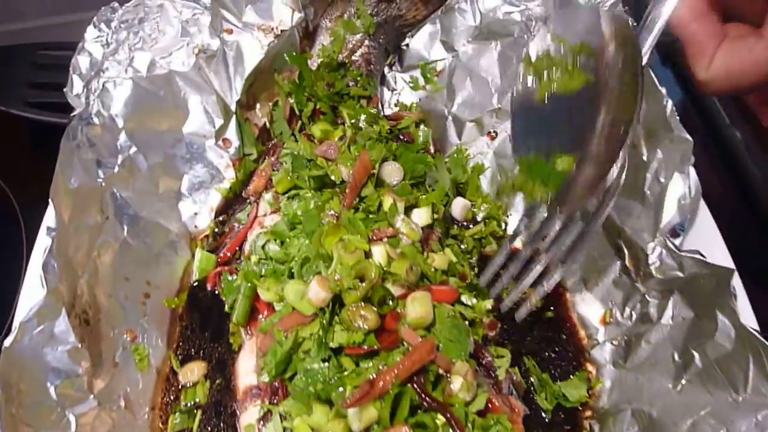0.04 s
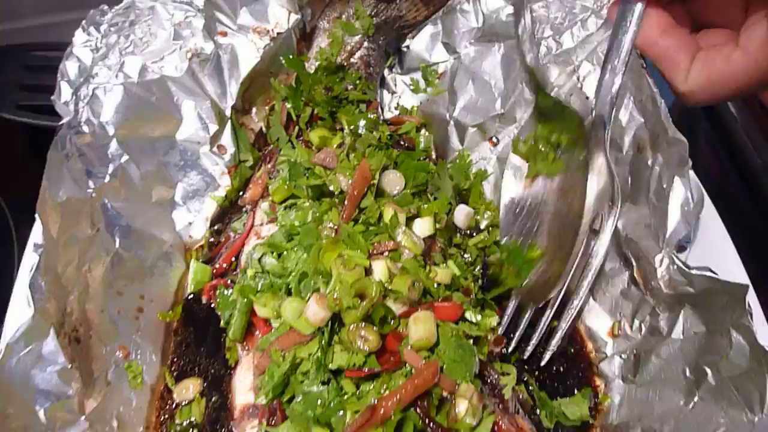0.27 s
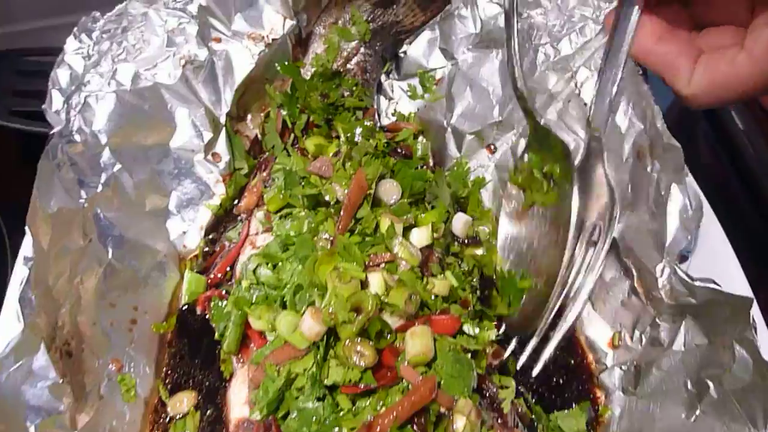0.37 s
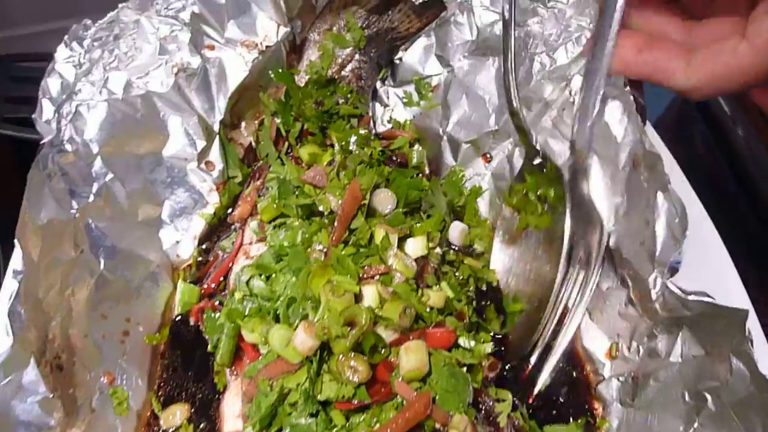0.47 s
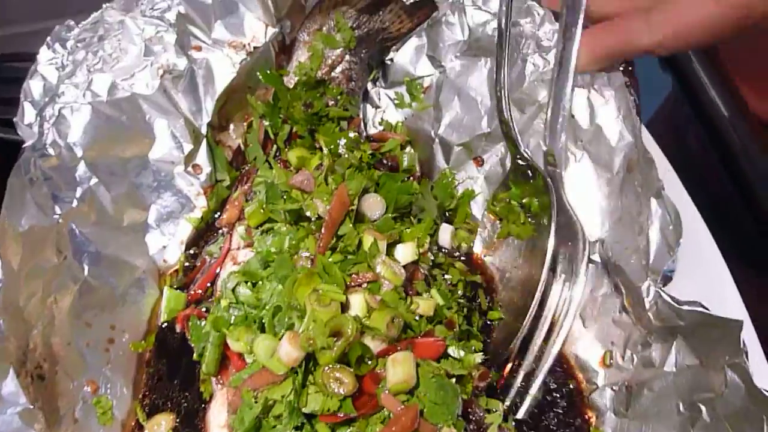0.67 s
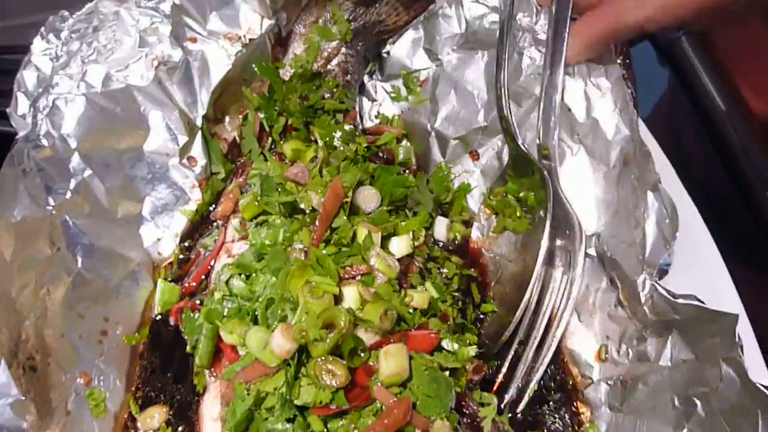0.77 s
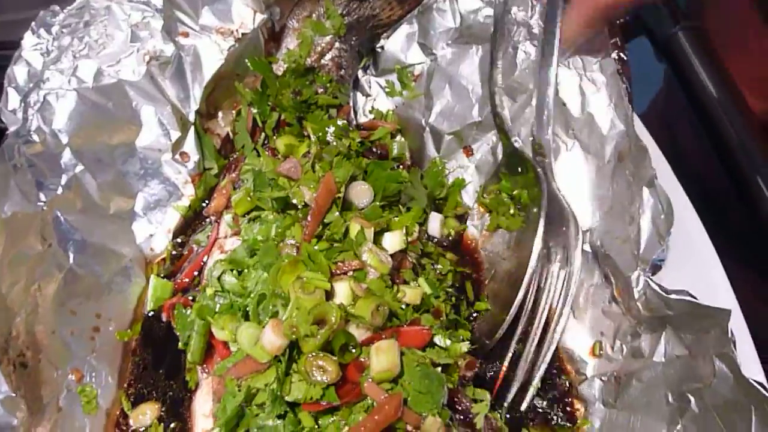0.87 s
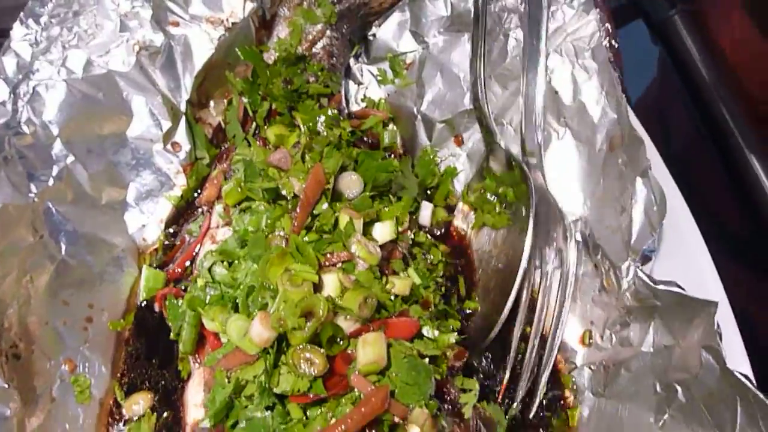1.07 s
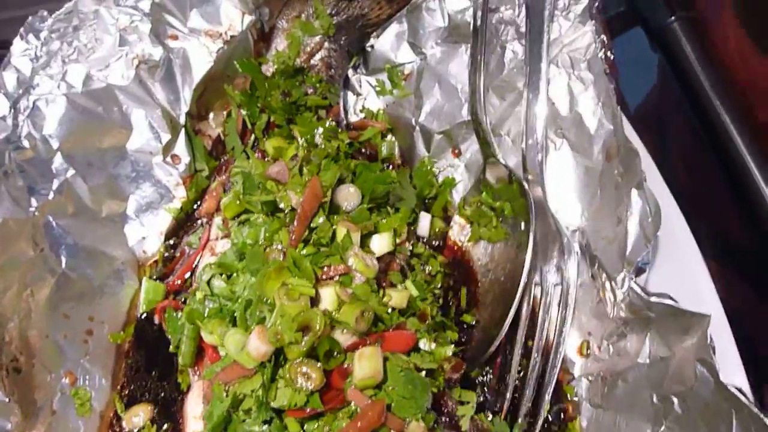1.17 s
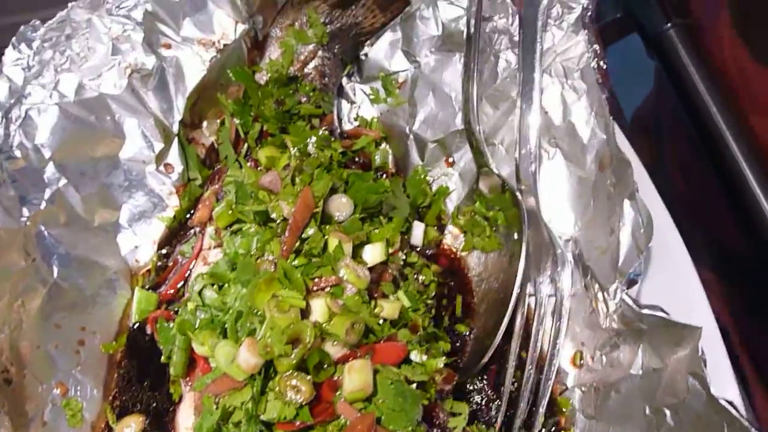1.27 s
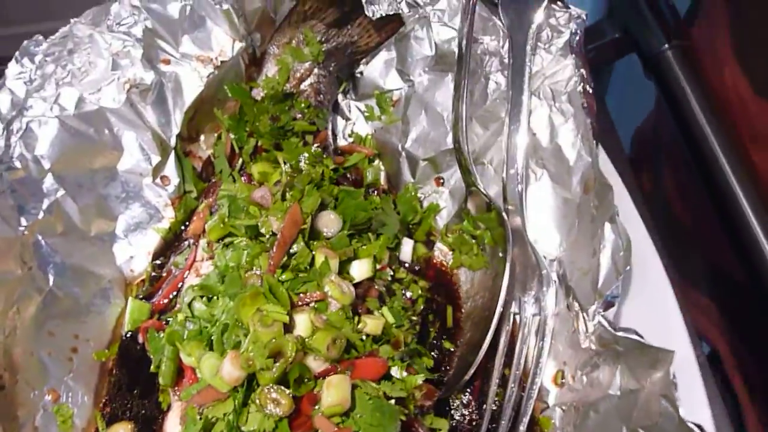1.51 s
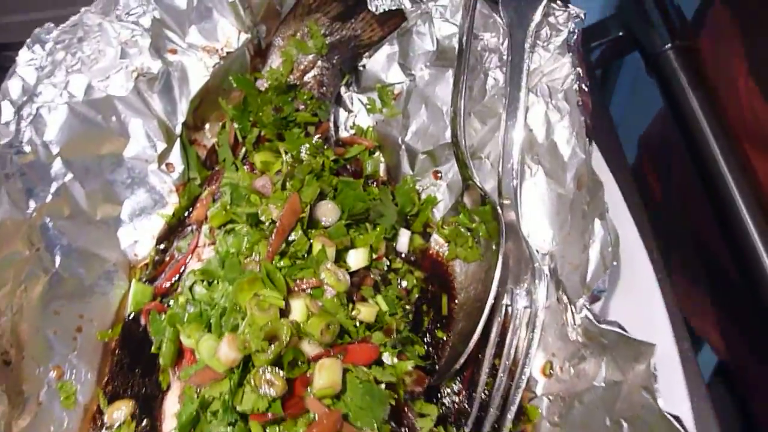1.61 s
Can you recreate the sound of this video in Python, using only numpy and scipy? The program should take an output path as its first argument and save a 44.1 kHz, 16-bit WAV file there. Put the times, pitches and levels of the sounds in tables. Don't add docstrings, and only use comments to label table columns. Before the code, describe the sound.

Aluminium foil crackles, snaps and rustles as a spoon and fork are pushed into it beside a baked fish; early metallic clinks, then denser creasing that dies away over faint kitchen fan hum, close small microphone.

```python
import sys
import numpy as np
from scipy import signal
from scipy.io import wavfile

SR = 44100
rng = np.random.default_rng(int(sys.argv[2]) if len(sys.argv) > 2 else 0)


def to_wav(s):
    ch = np.atleast_2d(s).T
    pcm = np.round(np.clip(ch, -1, 1) * 32767)
    wavfile.write(sys.argv[1], SR, pcm.astype(np.int16))


def field_ratio(decibels):
    return 10 ** (np.asarray(decibels, dtype=float) / 20)


N = 72765


def rms_one(x):
    return x / np.sqrt(np.mean(x ** 2) + 1e-20)


def top_one(x):
    return x / np.abs(x).max()


def at_hz(points, hz):
    point_hz, point_db = np.transpose(points)
    return np.interp(np.log(hz), np.log(point_hz), point_db)


def drift(rate):
    hop = 40
    pole = np.exp(-2 * np.pi * rate * hop / SR)
    noise = rng.standard_normal(N // hop + 2002)
    slow = signal.lfilter([1], [1, -2 * pole, pole ** 2], noise)[2000:]
    return np.interp(np.arange(N) / hop, np.arange(len(slow)), rms_one(slow))


def fade(t, t60):
    return np.exp(-np.log(1000) * t / t60)


def add(out, s, x):
    i = int(s * SR)
    out[i:i + len(x)] += x[:len(out) - i]


def high_pass(x, hz):
    return signal.sosfilt(signal.butter(2, hz, "high", fs=SR, output="sos"), x)


def band_pass(x, edges):
    return signal.sosfilt(signal.butter(2, edges, "band", fs=SR, output="sos"), x)


def band(x, hz, octaves):
    half_width = max(octaves, .1) / 2
    return band_pass(x, np.clip(hz * 2. ** np.array([-half_width, half_width]), 700, 12000))


def ring(x, hz, t60):
    r, w = fade(1 / SR, t60), 2 * np.pi * hz / SR
    return signal.lfilter([0, np.sin(w)], [1, -2 * r * np.cos(w), r * r], x)


def air():
    # f/Hz, level/(dB per Hz)
    room_spectrum = [(40, -25.5), (110, -19.5), (240, -8), (520, -3), (1400, -10), (2500, -14.5),
                     (4200, -16), (7300, -19.5)]
    level_db, flicker_db = -49.5, 1
    out, white = 0, rng.standard_normal((2, N))
    for k, hz in enumerate(36 * 2 ** np.arange(0, 8.1, .5)):
        noise = band_pass(white[k % 2], [hz * 2 ** -.25, hz * 2 ** .25])
        out = out + field_ratio(at_hz(room_spectrum, hz) + flicker_db * drift(8)) * noise
    return field_ratio(level_db + 1.0 * drift(1.7)) * rms_one(out)


def rustle():
    # t/s, level/dB
    pressure = [(0,-51),(.15,-52),(0.229,-43),(.36,-45.5),(.48,-39),(.55,-45),(0.698,-37.5),(0.759,-49.5),(.82,-49.5),(.93,-34.5),(0.989,-44.5),(1.06,-41.5),(1.15,-41.5),(1.2,-47.5),(1.27,-55),(1.65,-58.5)]
    # f/Hz, level/(dB per Hz)
    colour = [(600,-2),(1500,-3.5),(3440,3.5),(4500,-1.5),(5500,-3),(6900,-5),(8000,-44.5)]
    ticks_per_s, ring_cycles, uneven_db = 7200, 30.7, 2
    sizes = field_ratio(uneven_db * np.minimum(rng.exponential(1, N), 5)) * rng.choice([-1, 1], N)
    born = rng.random(N) < ticks_per_s * field_ratio(3 * drift(25)) / SR
    pitches = np.geomspace(700, 8000, 24)
    dealt = rng.integers(0, len(pitches), N)
    out = 0
    for k, hz in enumerate(pitches):
        r, w = field_ratio(-60 * hz / (ring_cycles * SR)), 2 * np.pi * hz / SR
        ticks = sizes * born * (dealt == k) + 1e-18
        ringing = signal.lfilter([1, -1], [1, -2 * r * np.cos(w), r * r], ticks)
        out = out + field_ratio(at_hz(colour, hz)) * hz * ringing
    s, db = np.transpose(pressure)
    return field_ratio(np.interp(np.arange(N) / SR, s, db)) * rms_one(out)


def snaps():
    # t/s, peak level/dB, f/Hz, bandwidth/octaves, t60/s
    landing = [(.038,-24.5,3980,1.3,0.0026),(.164,-36,4000,2,0.028),(.1825,-35.5,4940,0.18,0.06),(.167,-36,987,0.83,0.18),(.195,-27.5,1500,1.57,0.033),(.2018,-10.5,6180,1.2,0.01),(.2218,-19.5,5500,1.1,0.044),(.2668,-14.5,6500,0.82,0.011),(.2768,-16,3250,2,0.003),(.338,-23,5400,0.65,0.023),(.344,-25.5,5500,0.31,0.011),(.4002,-28.5,3420,0.95,0.025),(.4536,-20.5,3900,0.81,0.033),(.4668,-24.5,3500,0.89,0.05)]
    sliding = [(.5133,-20,1800,1.86,0.022),(.5357,-23.5,6200,0.6,0.03),(.560,-26.5,2700,1.1,0.087),(.5672,-20,5720,1.5,0.019),(.569,-23.5,3700,0.46,0.025),(.5692,-23.5,6000,0.5,0.023),(.6065,-17.5,4350,1.3,0.02),(.609,-27,5870,.9,0.033),(.6142,-19.5,4030,0.74,0.016),(.6395,-16.5,3000,1,0.0075),(.6355,-27.5,1414,1.5,.015),(.6418,-22,1900,1.1,0.02),(.6435,-28.5,3950,0.46,0.015),(.6565,-18,3900,1.3,0.041),(.6828,-25.5,5300,1.2,0.025),(.6957,-19,2720,1.4,0.021),(.705,-24,3470,0.37,0.044),(.7075,-39,2270,0.7,0.012),(.708,-22.5,3680,0.21,0.015),(.7075,-20,6350,0.36,0.024),(.757,-36.5,2620,1.2,0.09)]
    digging = [(.8222,-25,3470,1.7,0.022),(.8368,-30.5,5180,0.86,0.018),(.851,-38.5,3760,0.29,0.025),(.8708,-17,3380,0.38,0.011),(.8805,-18.5,2260,1.8,0.0058),(.8825,-18.5,4300,1.3,0.031),(.8853,-18.5,2150,1.64,0.01),(.895,-26,2310,1.4,0.024),(.9006,-9.5,5200,1.5,0.0071),(.9008,-35.5,1035,0.83,0.041),(.903,-15,5550,1.1,0.032),(.9232,-14,4600,0.86,0.037),(.9968,-19.5,4160,0.34,0.0086),(1.006,-31.5,3820,1.3,0.024),(1.0255,-22.5,3670,0.48,0.027),(1.029,-25,4050,0.5,.015),(1.0978,-33,4090,2,0.039),(1.1158,-26.5,3700,1.1,0.085),(1.1299,-14,5210,0.24,0.029),(1.140,-52.5,5000,0.84,0.023),(1.1935,-35,4360,0.8,0.16),(1.2175,-33,2070,0.69,0.042),(1.243,-39.5,4730,0.57,0.084)]
    click_db, facet_db, skirt_db, tail_db = 15, -10, -0.5, -21
    facet_cycles, tail_t60_s, tail_octaves = 85, 0.19, 1.53
    out, t = np.zeros(N), np.arange(SR // 6) / SR
    for s, db, hz, spread, t60 in [*landing, *sliding, *digging]:
        shake, spill = rng.standard_normal((2, len(t)))
        shudder = shake * fade(t, max(t60, .004))
        shudder[0] = field_ratio(click_db)
        snap = top_one(band(shudder, hz, spread))
        skirt = top_one(band(shudder, 4200, 3.2))
        facet = top_one(ring(shudder * fade(t, 0.018), hz, facet_cycles / hz)) / (.5 + spread)
        tail = rms_one(band(spill, np.sqrt(hz * 3800), tail_octaves))
        tail = tail * fade(t, tail_t60_s) * (1 - np.exp(-t / 0.0013))
        sound = snap + field_ratio(facet_db) * facet + field_ratio(skirt_db) * skirt + field_ratio(tail_db) * tail
        add(out, s, field_ratio(db) * sound)
    return high_pass(out, 500)


def pops():
    # t/s, peak level/dB, f/Hz, t60/s
    clean_facets = [(.038,-25.5,4310,0.0082),(.038,-38,2640,0.0034),(.038,-34,6800,0.0024),(.2019,-29,5170,.025),(.2019,-23.5,3400,0.021),(.2019,-21.5,6860,.012),(.2038,-23,5030,0.022),(.2038,-27.5,7120,.015),(.204,-21.5,3280,0.017),(.2555,-34.5,4190,0.077),(.267,-22.5,7580,0.023),(.2675,-29,5100,.015),(.268,-33,3450,0.013),(.2769,-19,4700,0.0089),(.2769,-19.5,3350,0.019),(.338,-31,5250,0.031),(.338,-29,3900,0.01),(.360,-36.5,3670,0.046),(.371,-34,3840,0.048),(.383,-37,3980,.05),(.609,-26,6100,0.027),(.6145,-38,5300,.012),(.6146,-28,3060,.015),(.6396,-21,1850,0.013),(.6396,-18,3630,.012),(.6424,-20.5,1640,0.0068),(.6424,-18,6200,0.0088),(0.6462,-20,4110,0.014),(0.6569,-21.5,3240,.018),(.6605,-24,3650,.015),(.6835,-28.5,5340,0.014),(.698,-27,3160,0.013),(0.709,-21.5,2290,0.014),(.8808,-27,1850,0.019),(.8853,-36,2000,.012),(.9006,-18.5,5200,0.014),(.9006,-31.5,1000,0.013),(.9032,-17.5,5600,0.025),(.9038,-15.5,2950,0.027),(.9233,-13.5,3600,.014),(.9243,-25.5,5330,0.015),(.9278,-23.5,3720,0.0214),(.997,-29.5,6220,0.016),(1.0008,-28,5300,0.0072),(1.0062,-30.5,2330,.018),(1.0253,-32.5,3700,0.048),(1.0285,-22,3700,0.014),(1.029,-35.5,5700,0.0083),(1.038,-32,3750,0.011),
                    (.4015,-32.5,2360,.025),(.5135,-32,2780,.012),(.4008,-26.5,3440,0.031),(.5358,-17,6140,0.022),(.569,-18,6200,0.017),(.569,-18,3800,.014),(.6959,-26,2380,0.0061),(.884,-34.5,1040,.04),(.925,-34,709,.06),(1.1302,-14,5270,.012),(1.195,-38.5,4230,.02),(1.2445,-40,4490,.025),(.2205,-29,4530,.006)]
    out = np.zeros(N)
    click = np.zeros(SR // 10)
    click[0] = 1
    for s, db, hz, t60 in clean_facets:
        add(out, s, field_ratio(db) * band(ring(click, hz, max(t60, .002)), hz, 2.2))
    return out


def cutlery():
    # t/s, level/dB, free ringing/s, loss at the next touch/dB
    clinks = [
        (0.2018, -23, .036, -13),
        (0.2772, -24, .047, -16),
        (0.344, -35, .018, -6),
        (0.9045, -28.5, .018, -12),
        (0.2222, -31, .014, -12),
        (0.205, -29, .034, -5),
    ]
    # f/Hz, level/dB, t60/s
    bowl = [(1895, -7, .1), (1965, -16, .2), (2417, -17, .2), (3214, -15, .12), (3628, -15, .18),
            (3100, -4, .04), (5050, -3, .04), (5130, -12, .15), (5540, -6, .18), (6136, 3, .09),
            (6745, -9, .08), (7100, -2, .04)]
    tines = [(3215, 0, .08), (3280, -13, .2), (4090, -11, .14), (2369, -19, .3), (4570, -23, .2),
             (5500, -8, .15), (6163, -2.5, .6), (6800, -14, .06), (8166, -4, .05)]
    neck = [(3410, -12, .4), (5300, -3, .25), (5609, 0, .12), (6175, -6, .3)]
    handle = [(2360, -3, .3), (2980, -4, .2), (3752, -7, .06), (5335, 0, .15), (6632, -10, .08),
              (7208, -9, .12)]
    rebound = [(4100, -10, .15), (5540, -11, .15), (6150, 0, .2)]
    stem = [(4562, 0, .35), (4097, -4, .25)]
    damping_s, wobble_db = .004, .8
    out, t = np.zeros(N), np.arange(SR // 4) / SR
    for (s, db, free_s, lost_db), modes in zip(clinks, (bowl, tines, neck, handle, rebound, stem)):
        tones = 0
        for hz, level_db, t60 in modes:
            wobble = field_ratio(level_db + wobble_db * drift(34)[:len(t)])
            tones = tones + wobble * np.sin(2 * np.pi * hz * t) * fade(t, t60)
        held = field_ratio(lost_db * np.clip((t - free_s) / damping_s, 0, 1))
        contact = 1 - np.exp(-t / 0.00025)
        add(out, s, field_ratio(db) * tones * held * contact)
    return out


def scene():
    return (air() + rustle() + snaps() + pops() + cutlery())[None]


def roll_off(x):
    return signal.sosfilt(signal.butter(12, 9020, fs=SR, output="sos"), x)


def record(dry):
    # f/Hz, width/Hz
    dips = [(2880, 236), (8000, 1900)]
    step_hz, step_db, top_hz, hiss_db = 7900, -21, 8560, -89.5
    x = high_pass(dry, 146)
    for hz, width in dips:
        x = signal.lfilter(*signal.iirnotch(hz, hz / width, fs=SR), x)
    low = signal.sosfilt(signal.cheby1(6, 1, step_hz, fs=SR, output="sos"), x)
    x = low + field_ratio(step_db) * x
    x = signal.sosfilt(signal.ellip(7, 1, 70, top_hz, fs=SR, output="sos"), x)
    hiss = field_ratio(hiss_db) * rng.standard_normal(x.shape)
    return roll_off(x + hiss)


dry = scene()
out = record(dry)
to_wav(out)
```